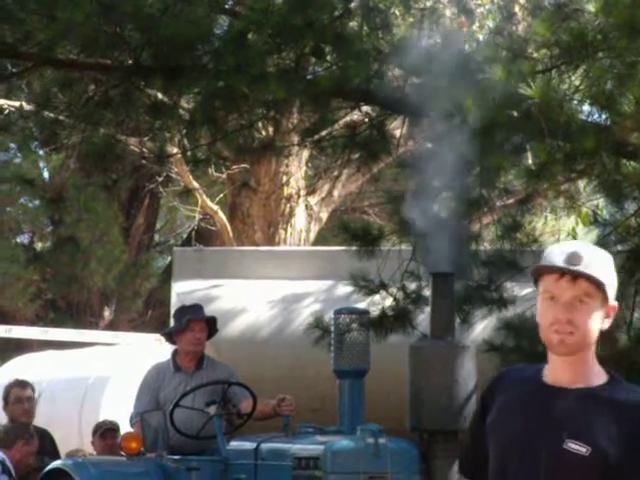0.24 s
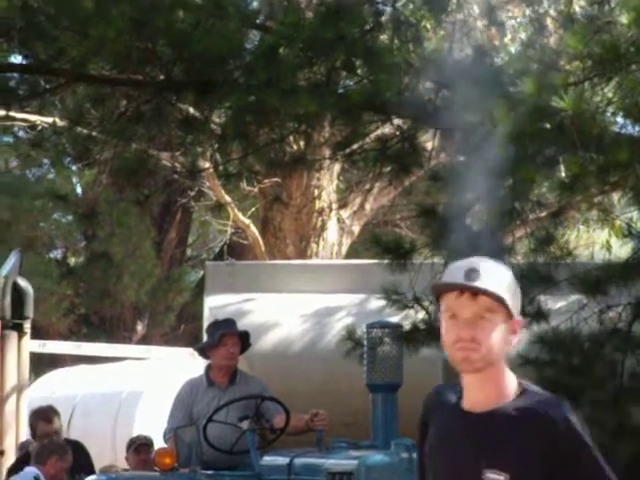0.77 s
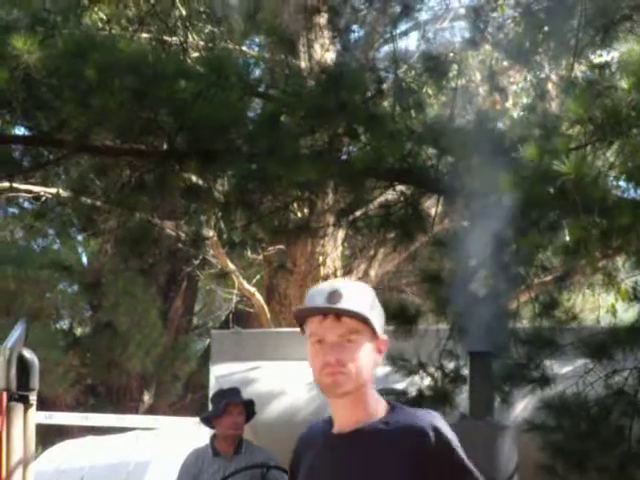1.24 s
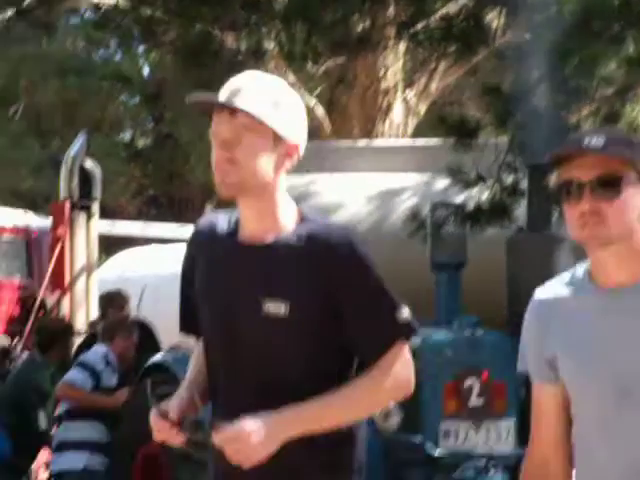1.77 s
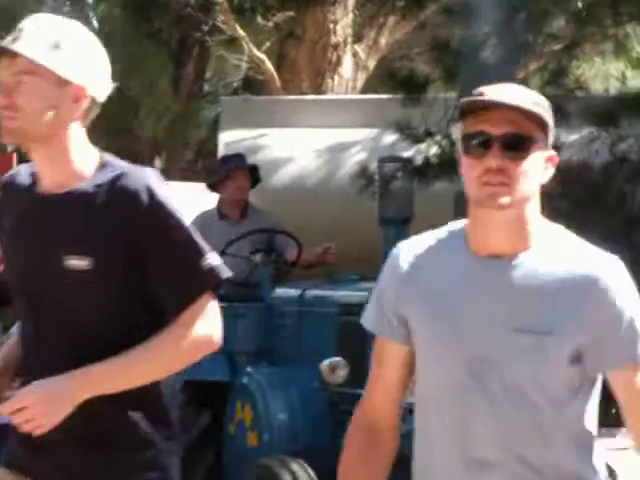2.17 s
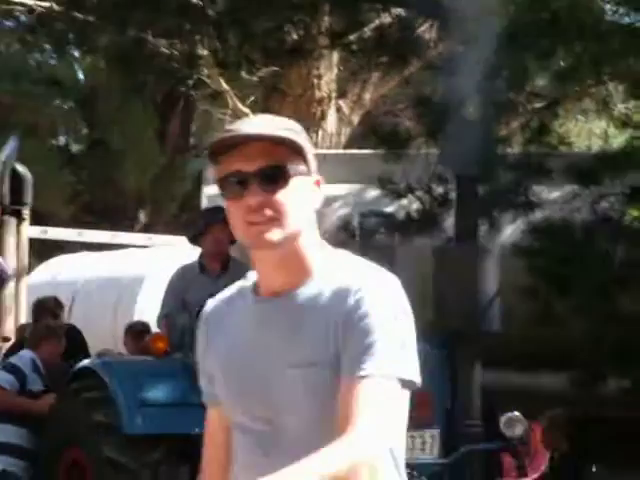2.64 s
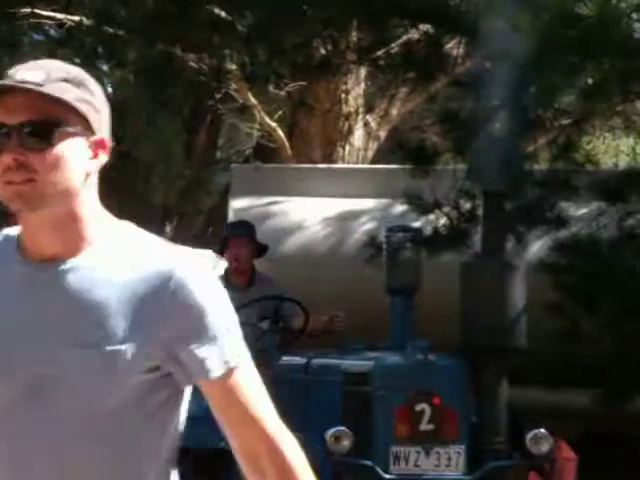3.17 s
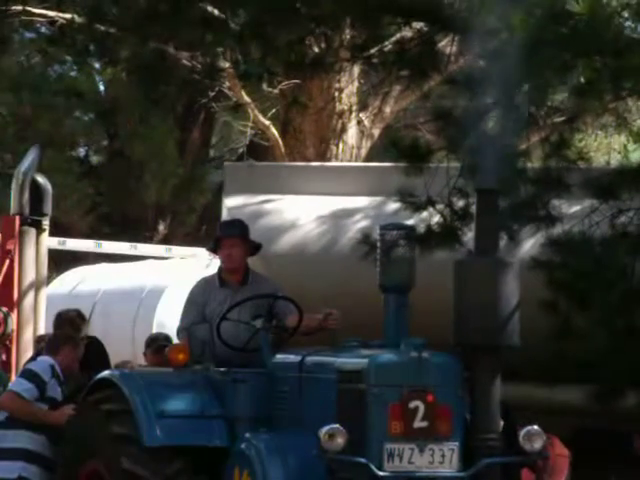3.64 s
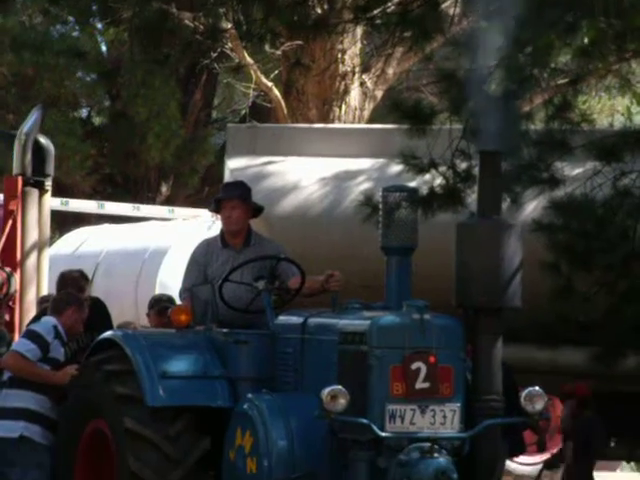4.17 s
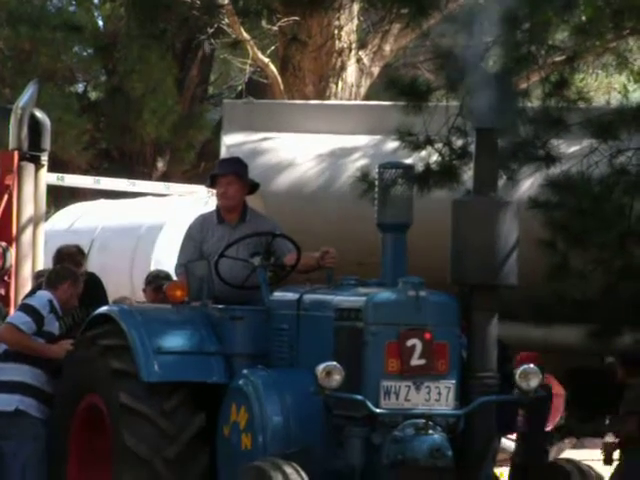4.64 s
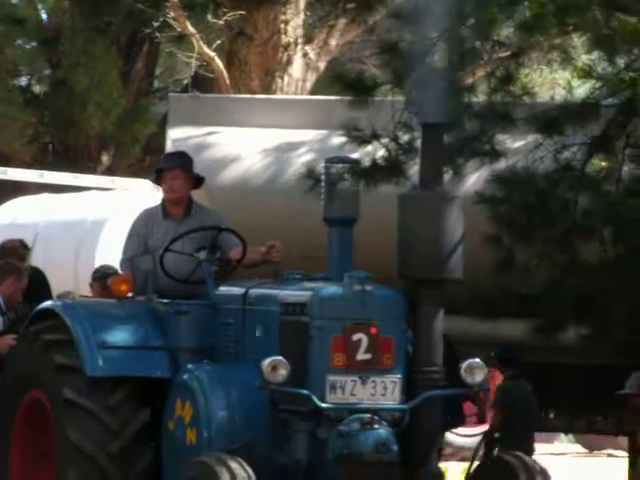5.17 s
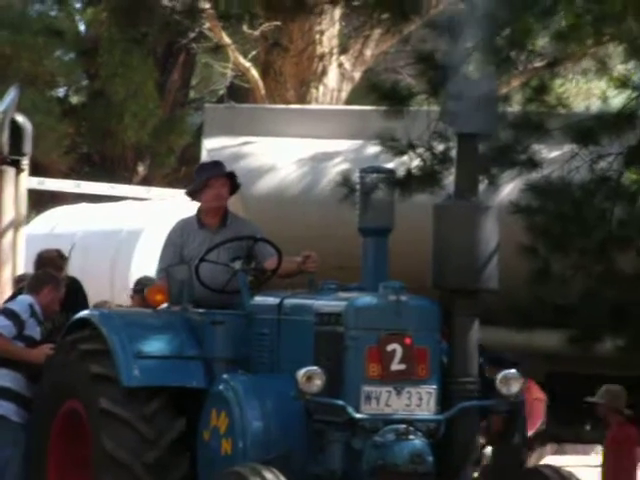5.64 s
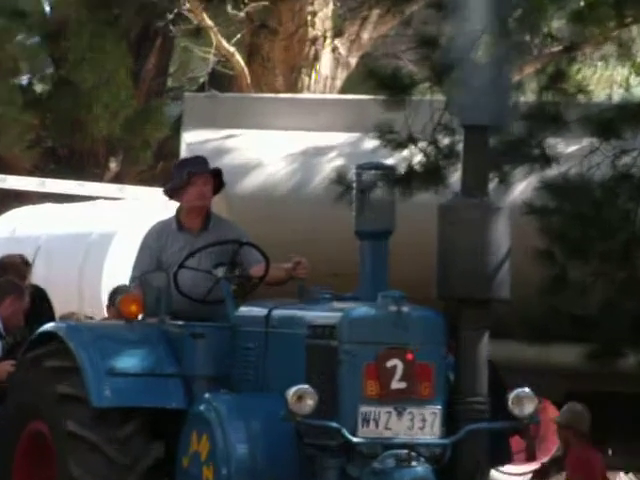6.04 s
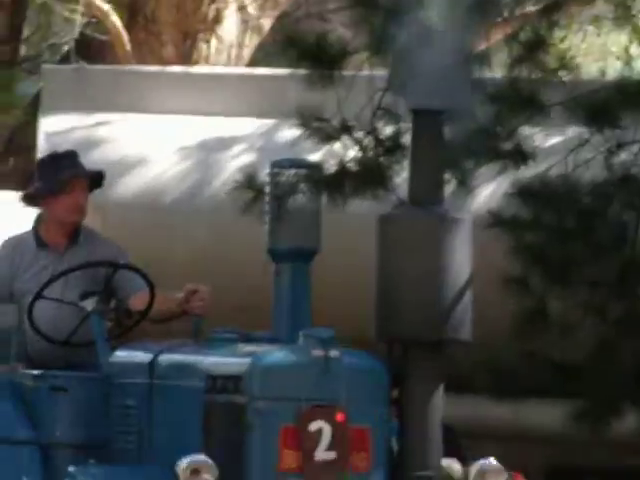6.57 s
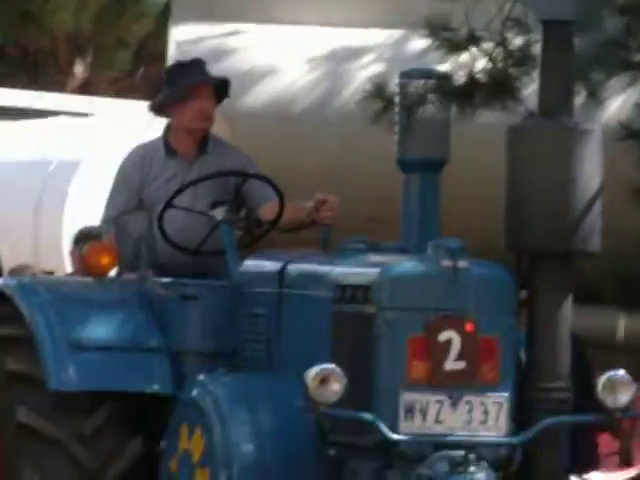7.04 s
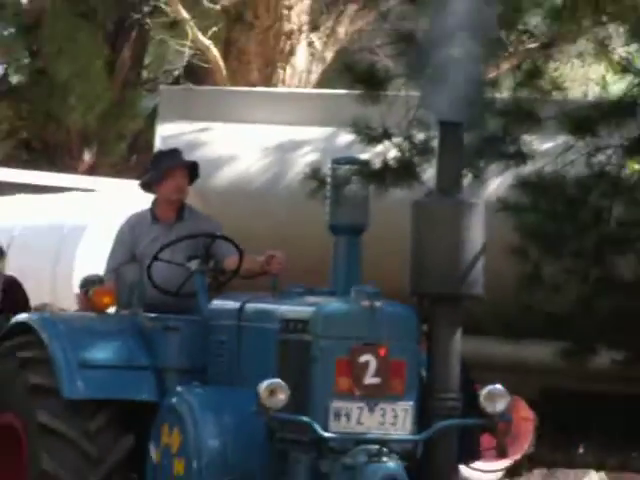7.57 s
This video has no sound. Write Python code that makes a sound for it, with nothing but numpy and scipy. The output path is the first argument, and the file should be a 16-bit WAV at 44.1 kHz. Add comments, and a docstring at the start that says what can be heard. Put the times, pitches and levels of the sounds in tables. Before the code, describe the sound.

A vintage single-cylinder two-stroke tractor runs continuously outdoors, firing about ten times a second. Every beat is a deep hollow thump from the tall silencer with a rough bark and rasp of gas. Short reflections come back from a tanker and trees. The rhythm skips once near one second, then slows and hardens towards the end. The close microphone crunches on each beat.

```python
"""A single-cylinder two-stroke tractor works under load in a clearing, about ten beats a second, slowing a little.
Each time the exhaust opens, a push of gas rings the tall silencer and a burst of rough noise tears out.
A tanker and the trees throw the beat back; behind it gears, fan and load churn and a fuel pump ticks.
The rhythm skips once with a faint click. The close microphone overloads on every beat."""
import sys
import numpy as np
from scipy import signal
from scipy.fft import rfft, irfft, next_fast_len
from scipy.io import wavfile

SR = 44100
rng = np.random.default_rng(int(sys.argv[2]) if len(sys.argv) > 2 else 0)


def wav_out(sig):
    """Save sig, one row per channel (or a flat mono array), as 16-bit PCM at SR to the path in sys.argv[1]."""
    wavfile.write(sys.argv[1], SR, np.round(np.clip(np.atleast_2d(sig).T, -1, 1) * 32767).astype(np.int16))


N = 344862
TIME = np.arange(N) / SR
# filters work on a longer stretch, so that endings have room to ring out
SIZE = next_fast_len(N + SR // 2)
# just above zero at the bottom, to allow division and logarithms
FREQ = np.maximum(np.arange(SIZE // 2 + 1) * SR / SIZE, 1e-6)

# how fast the crank turns: time_s, turns_per_second_hz
CRANK_SPEED = [(0, 10.425), (.8, 10.627), (1.6, 10.604), (3, 10.605), (4.4, 10.593), (5.4, 10.466),
               (6.2, 10.33), (7, 10.127), (7.8, 10.118)]
START_TURN = .371  # part of a turn already made at the start
SKIP_S, SKIP_TURN = 1.0605, .25  # when the rhythm skips, and the part of a turn left out


def crank_speed_hz(times):
    """Turns per second at the given times."""
    return np.interp(times, *np.transpose(CRANK_SPEED))


def firing_times():
    """The exhaust port opens once in every turn of the crank."""
    turns = START_TURN + np.cumsum(crank_speed_hz(TIME)) / SR
    turns = turns + SKIP_TURN * (TIME > SKIP_S)
    whole_turns = np.arange(1, int(turns[-1]) + 1)
    return np.interp(whole_turns, turns, TIME)


FREE_HZ = 10.6  # crank speed without extra drag, turns per second


def slowdown_hz(times):
    """How far the load drags the crank below its free speed."""
    return np.maximum(FREE_HZ - crank_speed_hz(times), 0)


def beats(times, db, scatter_db):
    """One kick for each firing; no two charges burn alike."""
    return impulses(times, undb(db + scatter_db * rng.standard_normal(len(times))))


# how hard the engine pulls, as a change in the thump: time_s, level_db
PULL = [(0, 0.2), (1.5, -0.24), (3.8, -1.76), (5.4, -.5), (6.2, 1.5), (7.8, 1.5)]


def exhaust_thump(times):
    """Every firing gives a smooth push; when the load slows the crank, a more abrupt one joins it."""
    pull_db = np.interp(times, *np.transpose(PULL))
    smooth = thump(beats(times, pull_db, scatter_db=.5), push_hz=73.2, db=53.5)
    slowed_hz = slowdown_hz(times)
    abrupt = thump(impulses(times, slowed_hz / slowed_hz.max()), push_hz=218, db=24)
    return smooth + abrupt


# resonances of the silencer and stack: pitch_hz, width_hz, level_db
STACK_RESONANCES = [(48, 29, 0), (108.02, 10.2, 18), (176.9, 13.6, 16), (206.3, 41, 6), (310, 24.2, 8.5)]
# reflections from the tanker and the trees: delay_s, level_db
REFLECTIONS = [(0.0142, -4.5), (0.032, -23.5), (0.0412, -13.5), (0.0598, -22.5), (0.0668, -17),
               (0.0897, -22)]


def thump(kicks, push_hz, db):
    """A push of gas rings the stack; nearby surfaces return it, a little duller."""
    # a pipe mouth radiates little of the deepest bass
    push = lowpass(push_hz) ** 3 * (1 - lowpass(29.8))
    stack = sum(undb(gain) * resonance(hz, width) for hz, width, gain in STACK_RESONANCES)
    echoes = sum(undb(gain) * delay(s) for s, gain in REFLECTIONS)
    paths = 1 + lowpass(3400) * echoes
    # the minus sign turns the wave upside down
    response = -undb(db) * push * stack * paths * delay(0.00018)
    # the engine is already running: the beat one turn before the first still rings
    turn_s = 1 / CRANK_SPEED[0][1]
    earlier = filtered(kicks * (TIME < turn_s), response * delay(-turn_s))
    return filtered(kicks, response) + earlier


# firings whose gas is set stronger, or once softer, than the rest: time_s, extra_db
SPECIAL_FIRINGS = [(1.55, -1), (2.682, 2.5), (3.438, 1), (3.908, 1), (4.95, 1.5), (5.234, 1.5),
                   (5.425, 1.5), (6.682, 2), (7.472, 2)]


def charges(times):
    """Gas level of each firing in dB: a small spread, plus the firings that stand out."""
    db = 0.43 * rng.standard_normal(len(times))
    for s, extra_db in SPECIAL_FIRINGS:
        nearest = np.argmin(np.abs(times - s))
        db[nearest] += extra_db
    return db


# level of the upper part of the bark: time_s, level_db
HIGH_BARK_LEVEL = [(0, 0.5), (1, 1), (2.2, -5), (3.9, 4), (4.5, -5), (5.3, 1.5), (6, -1), (6.8, 6.5),
                   (7.8, 2)]
LOW_BARK_DB, RASP_DB = 0.1, -1.38
RASP_DB_PER_HZ = 6.5  # the gas grows harsher as the load slows the crank


def exhaust_gas(times):
    """Each firing kicks three bands of gas noise, which share the strength of its charge."""
    charge_db = charges(times)
    high_db = np.interp(times, *np.transpose(HIGH_BARK_LEVEL))
    rasp_db = RASP_DB + RASP_DB_PER_HZ * slowdown_hz(times)
    low_bark = beats(times, charge_db + LOW_BARK_DB, scatter_db=1.4)
    high_bark = beats(times, charge_db + high_db, scatter_db=1.2)
    rasp = beats(times, charge_db + rasp_db, scatter_db=0.67)
    return gas(low_bark, high_bark, rasp)


# colour of the gas burst at the stack mouth: pitch_hz, level_db
GAS_COLOUR = [(150, 1), (300, 0.5), (430, -3), (620, 4), (800, 3.5), (1100, 0), (1500, -5.5), (2100, -3),
              (2650, -10), (3200, -3), (4000, -10)]
# ringing of the steel silencer box: pitch_hz, width_hz, level_db
BOX_RESONANCES = [(370, 8.3, -20), (582, 27, 4), (699, 29, 3.5), (729.4, 29, 1), (801, 12, -6.5),
                  (935, 32, -10), (1037, 28, -2), (1200, 13, 1), (1380, 10, -8.5), (1980, 61, -9)]
BARK_EDGE_HZ, RASP_EDGE_HZ = 850, 1500  # low bark | high bark | rasp


def gas(low_bark, high_bark, rasp):
    """Turbulent gas barks in the mids and rasps above; the pressure front and the bark ring the silencer box."""
    # eddies make the jet ragged
    jet = noise(GAS_COLOUR) * flicker(rate_hz=350, depth_db=1.58)
    low = filtered(jet, below(BARK_EDGE_HZ))
    low_and_mids = filtered(jet, below(RASP_EDGE_HZ))
    mids, high = low_and_mids - low, jet - low_and_mids
    barking = low * puff(low_bark, crack_db=-8.0, tail_db=-11.0, tail_s=0.011, return_db=-38)
    barking = barking + mids * puff(high_bark, crack_db=-3.5, tail_db=-14.0, tail_s=0.018, return_db=-31.5)
    rasping = high * puff(rasp, crack_db=-4, tail_db=-15.5, tail_s=0.023, return_db=-34.0)
    box = sum(undb(db) * resonance(hz, width) for hz, width, db in BOX_RESONANCES)
    # the bare kicks stand for the pressure front
    blow = undb(19) * low_bark + undb(-10.5) * barking
    ringing = filtered(blow, box * delay(.005))
    return barking + rasping + ringing


TREES_DELAY_S = .0415


def puff(kicks, crack_db, tail_db, tail_s, return_db):
    """Level of the gas: a spit as the port opens, the main crack, its scattered tail and a return from the trees."""
    spit = undb(-11.0) * swell(kicks, 0.0012, 0.00057, 0.0033)
    crack = undb(crack_db) * swell(kicks, 0.0041, 0.0019, 0.0034)
    tail = undb(tail_db) * swell(kicks, 0.0068, 0.0056, tail_s)
    from_trees = undb(return_db) * swell(kicks, TREES_DELAY_S + 0.0056, 0.0018, 0.0097)
    return spit + crack + tail + from_trees


PUMP_DELAY_S = .0769  # from one beat to the tick shortly before the next


def fuel_pump(times):
    """A short burst of noise ticks before the next beat, a little uneven in time and strength."""
    chance = rng.standard_normal((len(times), 2))
    stroke_times = times + PUMP_DELAY_S + 0.00015 * chance[:, 0]
    strokes = impulses(stroke_times, undb(2 * chance[:, 1]))
    hiss = noise([(500, -7.5), (1800, -2.0), (3000, 1.5), (4000, -4)])
    return undb(-28.5) * swell(strokes, 0, 0.00025, 0.0019) * hiss


# colour of the steady churn of gears, fan and driven load: pitch_hz, level_db
CHURN_COLOUR = [(15, 0.5), (32, 18), (60, 17), (120, 10.5), (220, 8.5), (300, -1), (420, 0.5), (650, 1.5),
                (1100, -3), (1600, -6), (2200, -7.5), (2800, -11.5), (3800, -14.5)]


def churn():
    """Gears, fan and load make a continuous noise that wavers unevenly."""
    return undb(-25.0) * noise(CHURN_COLOUR) * flicker(rate_hz=67, depth_db=0.86)


def undb(db):
    """Decibels to gain."""
    return 10 ** (np.asarray(db) / 20)


def filtered(x, response):
    """Pass x through a frequency response."""
    return irfft(rfft(x, SIZE) * response, SIZE)[:N]


def resonance(hz, width_hz):
    """Response of one damped resonance, gain 1 at its centre."""
    return 1 / (1 + 1j * (FREQ ** 2 - hz ** 2) / (FREQ * width_hz))


def lowpass(hz):
    """Response of a gentle (one-pole) low-pass."""
    return 1 / (1 + 1j * FREQ / hz)


def below(hz):
    """Response of a steep crossover's lower half."""
    return 1 / (1 + (FREQ / hz) ** 8)


def delay(s):
    """Response of a pure delay in seconds."""
    return np.exp(-2j * np.pi * FREQ * s)


def colour(points):
    """Response drawn through (pitch_hz, level_db) points."""
    hz, db = np.transpose(points)
    return undb(np.interp(np.log(FREQ), np.log(hz), db))


def noise(points):
    """Random noise coloured by (pitch_hz, level_db) points, then set to an rms of 1."""
    x = filtered(rng.standard_normal(N), colour(points))
    return x / x.std()


def flicker(rate_hz, depth_db):
    """A gain that glides to a new random level rate_hz times a second."""
    knots = rng.standard_normal(SR // 4)
    wander = np.interp(TIME * rate_hz, np.arange(len(knots)), knots)
    return undb(depth_db * wander)


def impulses(times, sizes):
    """One impulse of the given size at each time."""
    # times past the end fall in one spare sample, which is cut off
    index = np.clip(np.round(times * SR).astype(int), 0, N)
    return np.bincount(index, sizes, N + 1)[:N]


def swell(kicks, after_s, rise_s, decay_s):
    """Envelope that rises and dies away after each kick."""
    age = np.maximum(TIME[:SR // 3] - after_s, 0)
    shape = (1 - np.exp(-age / rise_s)) * np.exp(-age / decay_s)
    return signal.fftconvolve(kicks, shape)[:N]


def scene():
    """Exhaust and machinery as they reach the microphone."""
    times = firing_times()
    exhaust = exhaust_thump(times) + exhaust_gas(times)
    machinery = churn() + fuel_pump(times)
    return (exhaust + machinery)[None]


def overload(x, ceiling, knee):
    """Flatten the peaks against a ceiling; a high knee bends sharply."""
    return x / (1 + np.abs(x / ceiling) ** knee) ** (1 / knee)


# tone of the microphone after its overload: pitch_hz, level_db
MICROPHONE_TONE = [(4200, -0.5), (4800, -10.5), (6300, -7.5), (8000, -2.5), (10000, -3.5), (14000, -2)]
BAND_HZ, TOP_HZ = 4020, 15800  # upper limits before the overload and at the very end


def record(dry):
    """A narrow-band microphone overloads on each beat; its distortion fills the treble."""
    band = 1 / np.sqrt(1 + (FREQ / BAND_HZ) ** 50)
    loud = overload(filtered(dry[0], band), ceiling=0.74, knee=24.0)
    # the distortion has a thin ring high up
    ring = 1 + undb(-6.5) * resonance(8000, 250)
    loud = filtered(loud, colour(MICROPHONE_TONE) * ring)
    # the faint click at the skip
    click = filtered(impulses(np.array([SKIP_S]), undb([-15])), lowpass(5000))
    top = signal.ellip(8, .1, 70, TOP_HZ, fs=SR, output="sos")
    return signal.sosfilt(top, loud + click)[None]


dry = scene()
out = record(dry)
wav_out(out)
```